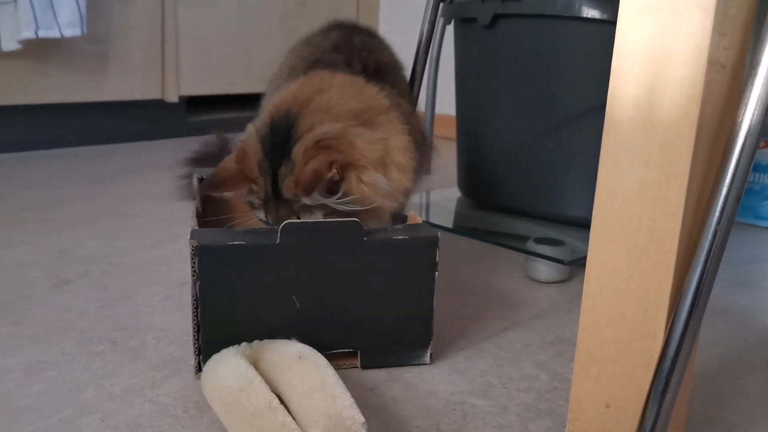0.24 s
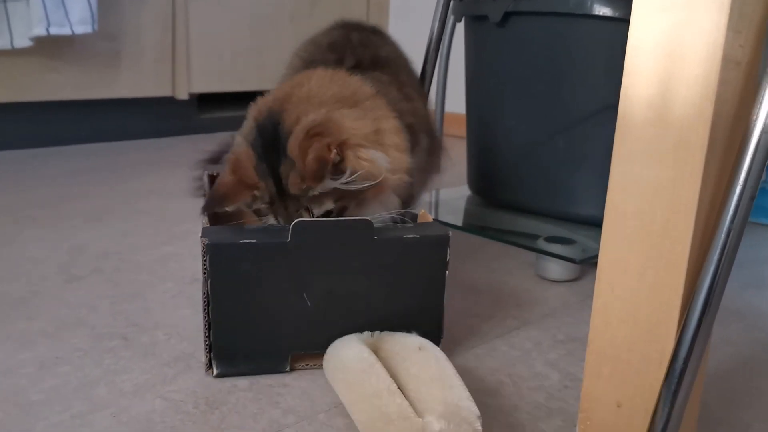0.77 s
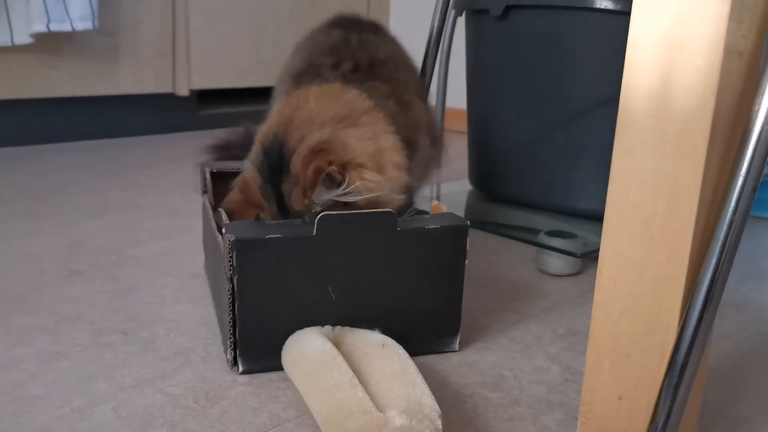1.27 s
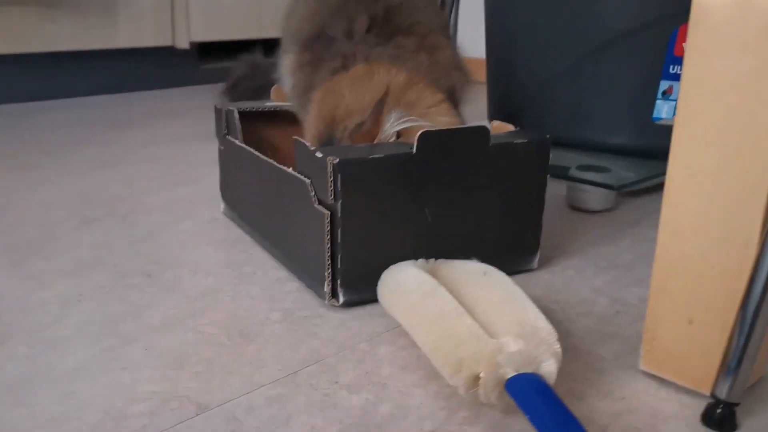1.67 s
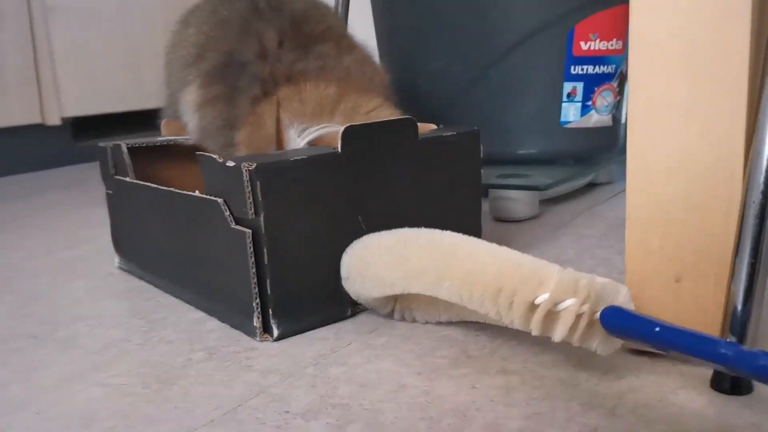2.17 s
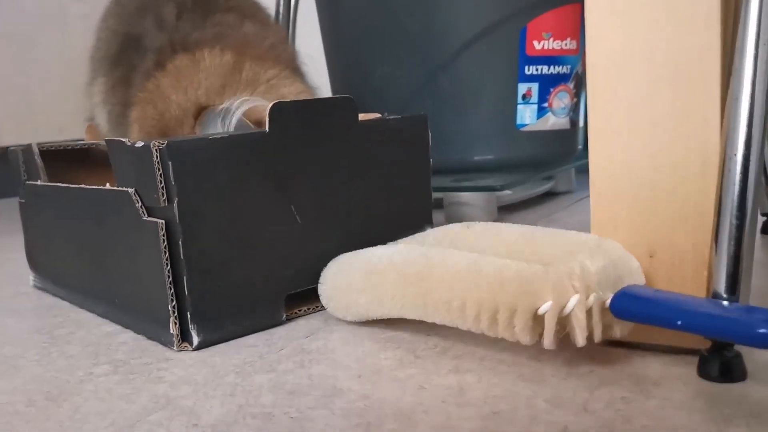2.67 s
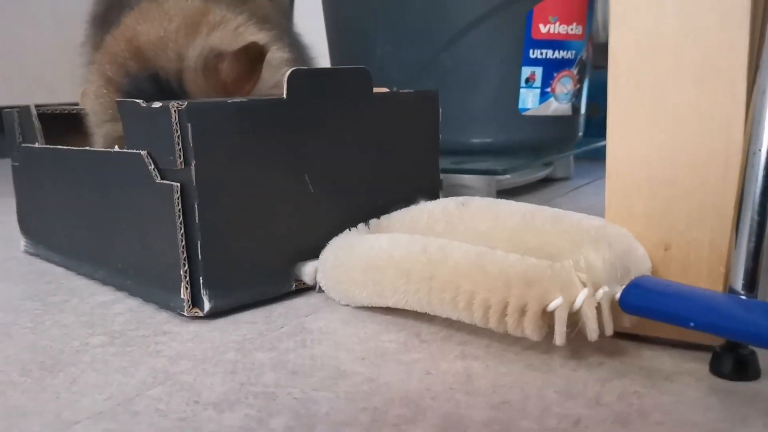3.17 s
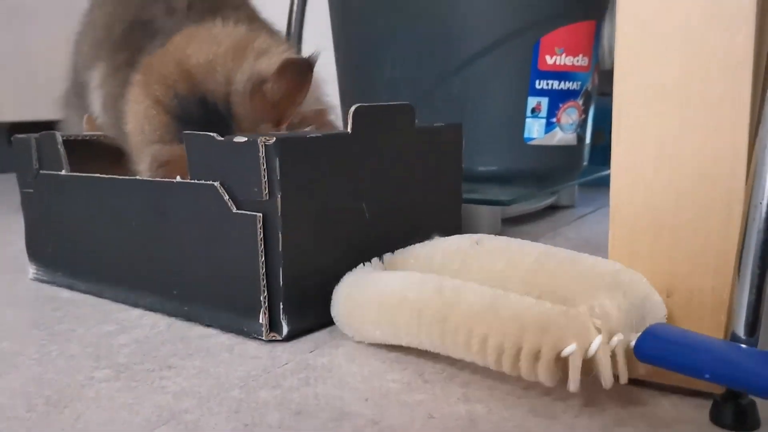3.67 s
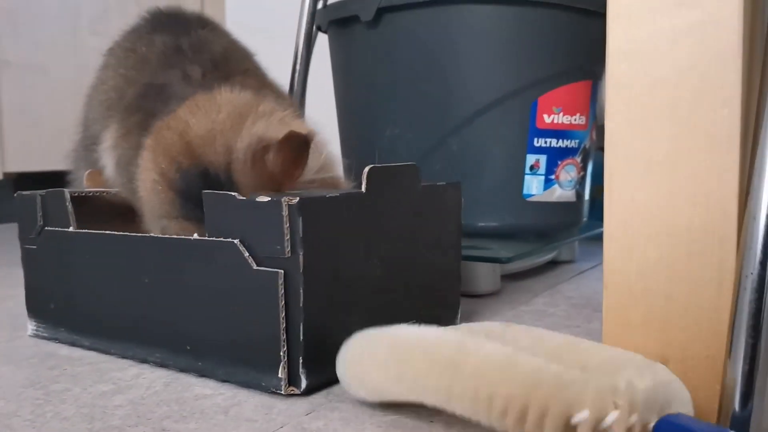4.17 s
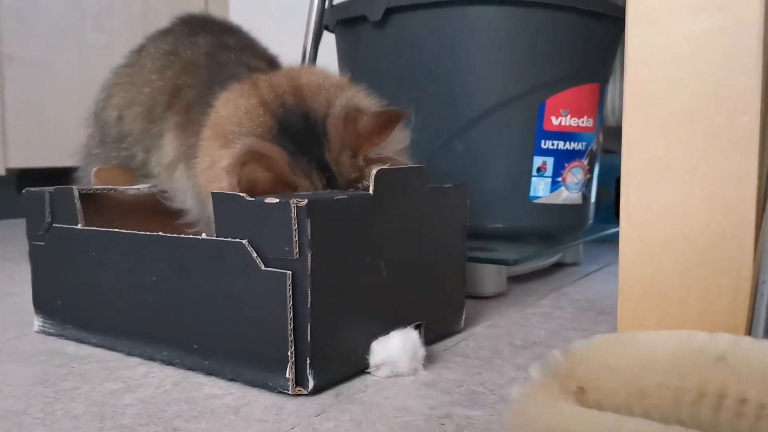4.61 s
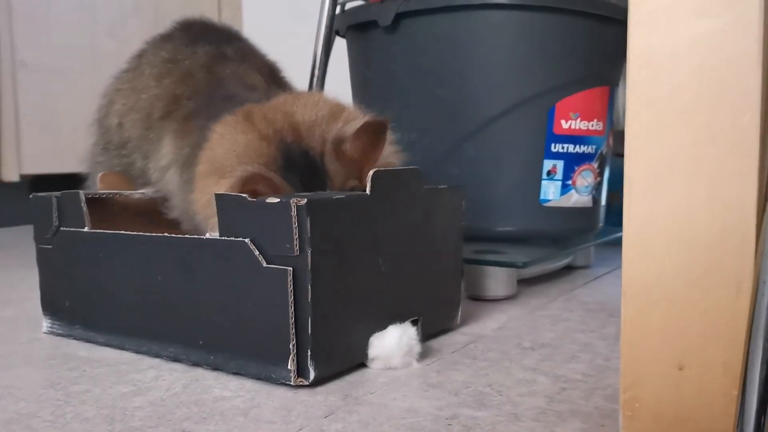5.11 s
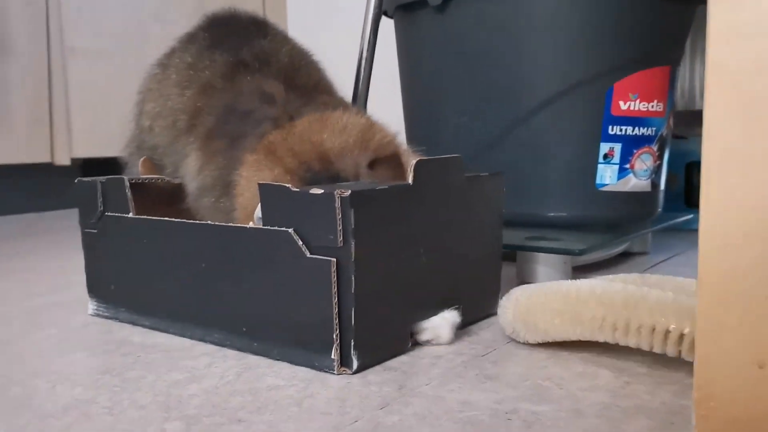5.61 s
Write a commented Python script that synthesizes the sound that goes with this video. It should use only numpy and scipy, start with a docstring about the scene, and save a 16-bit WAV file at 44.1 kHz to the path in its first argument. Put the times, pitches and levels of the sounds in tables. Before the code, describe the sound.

A cat paws and scratches inside a cardboard box, with hollow knocks, dry claw scrapes and soft pad swishes in a quiet kitchen.

```python
"""Kitchen floor, bare room: a cat digs about in a cardboard box, teased with a soft mop pad.
Paws knock on the walls and claws scrape the card: jerky stick-slip noise and impulses drive damped modes.
The pad swishes as smooth coloured noise; echoes of box and room are shaped noise.
Damped sines make low bumps of the handled microphone and one soft thud of the pad.
Low noise makes the rumble of microphone and rocking box, over a faint hush."""
import sys
import numpy as np
from scipy import signal
from scipy.fft import rfft, irfft
from scipy.io import wavfile

SR = 44100
rng = np.random.default_rng(int(sys.argv[2]) if len(sys.argv) > 2 else 0)


def int16_out(signal):
    """Quantize to a 16-bit WAV file."""
    q = np.round(np.clip(np.atleast_2d(signal).T, -1, 1) * 32767)
    wavfile.write(sys.argv[1], SR, q.astype(np.int16))


N = 257984
PORT_LEAD_S = 0.00015  # left port leads


def from_db(db):
    """Amplitude gain of a level in dB."""
    return 10 ** (np.asarray(db) / 20)


def rms_one(x):
    """Scales to rms 1 over all channels."""
    return x / np.sqrt(np.mean(x ** 2) + 1e-20)


def unit_energy(x):
    """Scales an impulse response to energy 1, averaged over channels."""
    return x / np.sqrt(np.mean(np.sum(x ** 2, axis=-1)) + 1e-20)


def in_time(rows):
    """Straight-line curve through (time [s], value) rows."""
    return np.interp(np.arange(N) / SR, *np.transpose(rows))


def at_hz(points, hz):
    """Curve through (frequency [Hz], value) rows, straight over log frequency."""
    known_hz, values = np.transpose(points)
    return np.interp(np.log(np.maximum(hz, 1)), np.log(known_hz), values)


def colour(x, spectrum, share=1):
    """Applies a smooth dB spectrum, or a share of it."""
    size = x.shape[-1]
    gain = from_db(share * at_hz(spectrum, np.fft.rfftfreq(size, 1 / SR)))
    return irfft(rfft(x) * gain, size)


def drift(knots_per_s):
    """Straight lines between random knots of spread 1."""
    knots = rng.standard_normal(int(N / SR * knots_per_s) + 2)
    return np.interp(np.arange(N) / SR * knots_per_s, np.arange(len(knots)), knots)


def swell(t, start, hold, rise, fall):
    """Grows exponentially towards its start, holds, and dies away; all in s."""
    before = (start - t) / rise
    after = (t - start - hold) / fall
    return np.exp(-np.maximum(np.maximum(before, after), 0))


def through(x, response):
    """Convolves each channel with an impulse response."""
    return signal.fftconvolve(np.atleast_2d(x), np.atleast_2d(response), axes=1)[:, :N]


# likeness of the ports for scattered sound: (frequency [Hz], correlation [-1..1])
LIKENESS = [(60, 1), (300, 0.93), (650, 0.83), (1400, 0.3), (2300, 0.43), (3100, -0.9), (6500, 0.59),
            (15000, 0.57)]


def diffuse(size):
    """Stereo white noise whose left-right correlation depends on frequency."""
    mid, side = rfft(rng.standard_normal((2, size)))
    alike = np.clip(at_hz(LIKENESS, np.fft.rfftfreq(size, 1 / SR)), -1, 1)
    spectra = np.sqrt(1 + alike) * mid + np.sqrt(1 - alike) * side * [[1], [-1]]
    return rms_one(irfft(spectra, size))


# room decay: (frequency [Hz], t60 [s])
ROOM_T60_S = [(200, 0.37), (500, 0.19), (1000, 0.4), (2300, 0.4), (6500, 0.39), (12000, 0.38)]


def room_tail(size=32768):
    """Scattered room sound: noise that builds up over some 14 ms and dies band by band."""
    t, hz = np.arange(size) / SR, np.fft.rfftfreq(size, 1 / SR)
    noise = rfft(diffuse(size))
    centres_hz = [row[0] for row in ROOM_T60_S]
    tail = 0
    # each band is a triangle over log frequency that peaks at its centre
    for weights, (_, t60_s) in zip(np.eye(len(centres_hz)), ROOM_T60_S):
        band = irfft(noise * at_hz(list(zip(centres_hz, weights)), hz))
        tail = tail + band * from_db(-60 * t / t60_s)
    return unit_energy(tail * (1 - np.exp(-(t / 0.014) ** 2)))


def path(tail, direct_db, box_db, room_db, box_decay_s, left_lead_s):
    """Way to the ports: straight, rattling round the box, and by the room."""
    t = np.arange(tail.shape[-1]) / SR
    arrival_s = left_lead_s * np.array([[-.5], [.5]]) + 8 / SR
    direct = np.sinc((t - arrival_s) * SR) * (t < .001)
    dying = from_db(-60 * t / box_decay_s) * (1 - np.exp(-(t / 0.0011) ** 2))
    echoes = rfft(diffuse(len(t)) * dying)
    # walls scatter all pitches about equally: flatten, then damp again
    flat = irfft(echoes / (np.abs(echoes) + 1e-12))
    echoes = unit_energy(flat * np.sqrt(dying))
    return from_db(direct_db) * direct + from_db(box_db) * echoes + from_db(room_db) * tail


def ringing(modes, low_hz, high_hz, order=2, size=8192):
    """Impulse response of damped modes inside a band, with unit energy."""
    t = np.arange(size) / SR
    rings = 0
    for k, (hz, width_hz, db) in enumerate(modes):
        decay = width_hz * np.exp(-np.pi * width_hz * t)
        rings = rings + (-1) ** k * from_db(db) * decay * np.cos(2 * np.pi * hz * t)
    band = signal.butter(order, [low_hz, min(high_hz, .45 * SR)], "band", fs=SR, output="sos")
    return unit_energy(signal.sosfilt(band, rings))


def slips(per_s, spread_db, clump_db, rub):
    """Tiny stick-slip snaps of uneven size, in clumps, over smooth rubbing; rms 1."""
    sizes = from_db(spread_db * np.minimum(rng.exponential(1, N), 3)) * rng.choice([-1, 1], N)
    snaps = rms_one(sizes * (rng.random(N) < per_s / SR))
    rubbing = rub * rng.standard_normal(N)
    return rms_one((snaps + rubbing) * from_db(clump_db * drift(170)))


# hush spectrum: (frequency [Hz], level [dB])
HUSH_SPECTRUM = [(20, 0.5), (100, -1.5), (300, 0), (700, -11.5), (1500, -4.5), (2400, -13.5), (3100, -10),
                 (5000, -12), (7000, -10), (8500, -36), (10500, -35.5), (15000, -32)]


def hush():
    """Faint steady background: coloured stereo noise."""
    return from_db(-58.5) * rms_one(colour(diffuse(N), HUSH_SPECTRUM))


# low bumps, microphone handling and one soft thud of the mop pad:
# (time [s], level [dB], pitch [Hz], contact click re bump [dB])
LOW_BUMPS = [(1.235, -36, 83, -4), (1.746, -34.5, 145, -21), (1.924, -41.5, 172, -19),
             (2.452, -42.5, 123, -10), (2.772, -29.5, 56, -51), (3.703, -37, 119, 9.5),
             (3.779, -40.5, 159, -14), (3.893, -30.5, 161, -6), (3.919, -37, 111, -10),
             (3.966, -36.5, 76.5, 7), (5.087, -40.5, 86, -4), (5.315, -39, 58, 4.5),
             (5.541, -32.5, 102, -8), (5.597, -45, 100, -8), (5.719, -39.5, 152, 0.5)]
# low rumble from the handled microphone and the box rocking on the floor: (time [s], relative level [dB])
LOW_RUMBLE = [(0.0, -72.5), (1.12, -71), (1.32, -53.5), (1.43, -61), (1.6, -56.5), (1.83, -52), (2.0, -66),
              (2.27, -57.5), (2.65, -70), (3.07, -55), (3.3, -60), (3.75, -62), (3.94, -46), (4.06, -68),
              (4.38, -63.5), (4.8, -65.5), (5.45, -61.5), (5.57, -53), (5.85, -73)]
# rumble spectrum: (frequency [Hz], level [dB])
RUMBLE_SPECTRUM = [(20, 2), (50, 7), (100, -0.5), (180, -6), (300, -15.5), (600, -13), (2000, -66)]
BUMP_CYCLES, LINGER_DB_PER_DB = 2.36, 0.13  # cycles per 60 dB of decay; softer contact rings longer
SHAKE_DB, SHAKE_RISE_S, SHAKE_FALL_S = -22, 0.0044, 0.03  # level re bump


def bumps_and_rumble(left_db, right_db):
    """Damped sine bumps with soft contact clicks, and a lumpy noise rumble that swells at each bump."""
    t, bumps, shake = np.arange(SR // 4) / SR, np.zeros(N + SR), 0
    click = np.sin(2 * np.pi * 420 * t) * np.exp(-t / 0.002)
    for s, db, hz, click_db in LOW_BUMPS:
        cycles = BUMP_CYCLES * from_db(-LINGER_DB_PER_DB * click_db)
        at, age = round(s * SR), hz * t / cycles
        bump = np.sin(2 * np.pi * hz * t) * (1 - np.exp(-(age / 0.13) ** 2)) * from_db(-60 * age)
        bumps[at:at + len(t)] += from_db(db) * (bump / np.abs(bump).max() + from_db(click_db) * click)
        shake = shake + from_db(db + SHAKE_DB) * swell(np.arange(N) / SR, s, 0, SHAKE_RISE_S, SHAKE_FALL_S)
    level = from_db(0.5 + in_time(LOW_RUMBLE) + 2.2 * drift(23))
    rumble = rms_one(colour(rng.standard_normal((2, N)), RUMBLE_SPECTRUM)) * np.hypot(level, shake)
    shared = (bumps[:N] + rumble[0]) * from_db([[left_db], [right_db]])
    return shared + rumble[1] * from_db([[-6.5], [-12]])


# sliding pad and fur, and one brief hissing claw catch: (start [s], length [s], level [dB])
SWISHES = [(0.176, 0.17, -46), (0.57, 0.085, -58), (1.174, 0.064, -61), (1.285, 0.011, -32.5),
           (1.512, 0.11, -51), (2.234, 0.055, -41), (3.484, 0.041, -48), (3.875, 0.084, -58.5),
           (4.526, 0.23, -47.5), (4.8, 0.24, -55), (5.522, 0.054, -51.5)]
# swish spectrum: (frequency [Hz], level [dB])
SWISH_SPECTRUM = [(300, -25), (1200, -29), (2300, -40), (3000, -4.5), (4500, -7.5), (6000, 0.5),
                  (7300, 2.5), (8300, -10.5), (10000, -24), (15000, -30)]
SWISH_ATTACK_S, SWISH_RELEASE_S, FUR_DB = 0.02, 0.043, -64  # the fur never quite stops rubbing


def swish(tail):
    """Fine, even hiss of sliding fibres and one claw catch: dense slips and rubbing, coloured."""
    t = np.arange(N) / SR
    power = from_db(FUR_DB) ** 2
    for s, length_s, db in SWISHES:
        power = power + (from_db(db) * swell(t, s, length_s, SWISH_ATTACK_S, SWISH_RELEASE_S)) ** 2
    grain = slips(per_s=5000, spread_db=-0.5, clump_db=-1.5, rub=0.84)
    hiss = rms_one(colour(grain, SWISH_SPECTRUM)) * np.sqrt(power)
    way = path(tail, direct_db=-1.0, box_db=-0.5, room_db=-7, box_decay_s=0.066, left_lead_s=PORT_LEAD_S)
    return through(hiss, way)


# readiness to answer a paw: panel, corrugation, claw [dB]
RESPONSE_DB = [-1, -0.63, -0.5]


def shares(bite_db, rasp_db):
    """Gains of panel, corrugation, claw: bite moves force from wall to claws, rasp digs into the card."""
    return from_db(np.array(RESPONSE_DB) + [-bite_db, rasp_db, bite_db])


# bite: below 0 the soft pad drums on the wall, above 0 the claws hiss; rasp: digging into the corrugation
# paw strokes: (peak time [s], rise [s], release [s], level [dB], bite [dB], rasp [dB])
STROKES = [(.24, 0.039, 0.067, -42.5, -0.5, 4.5), (0.35, 0.083, 0.025, -41, 0, 0),
           (.654, 0.0084, 0.021, -37.5, -4, -3), (.775, 0.0022, .02, -41, -10, -11),
           (0.798, 0.0084, 0.055, -28, 0.5, -3), (1.149, 0.037, 0.057, -47.5, -5, -2),
           (1.285, 0.031, 0.047, -29, 1, 1), (1.562, 0.074, .032, -44, 1.5, -1.5),
           (1.758, 0.035, 0.03, -39, 1, -2), (1.845, 0.0072, 0.036, -33, 6.5, 0.5),
           (2.064, .004, 0.078, -48.5, -0.5, -8), (2.243, 0.057, .032, -36, -0.5, -2),
           (2.532, 0.012, 0.018, -41.5, -5.5, -4), (2.55, 0.0022, 0.03, -38, -5, 3),
           (2.591, 0.02, 0.025, -32.5, -3, 1.5), (2.824, 0.011, 0.014, -49.5, -5.5, -3),
           (2.895, 0.014, .045, -42, -4, -1), (2.974, 0.022, 0.076, -33.5, -3, -2.5),
           (3.055, .014, 0.042, -34.5, -3.5, 0.5), (3.21, 0.0094, 0.016, -47, -13.5, -1),
           (3.354, 0.026, 0.021, -40.5, -3.5, -3), (3.415, .012, .03, -52, -12, -16),
           (3.505, 0.05, 0.024, -37, -2, -0.5), (3.628, 0.005, 0.029, -25.5, 1, 1.5),
           (3.708, .012, 0.032, -43.5, 5, 7.5), (3.795, 0.027, 0.02, -47.5, 5, 2.5),
           (4.208, 0.0046, 0.065, -47, 1, -3.5), (4.358, 0.0073, 0.032, -47, -1, -3.5),
           (4.497, 0.0045, 0.027, -44, 2, 1), (4.597, .004, 0.026, -44, 6.5, 3),
           (5.145, 0.043, 0.048, -37.5, 2, -0.5), (5.4, 0.021, 0.015, -46, -1, 1),
           (5.63, 0.016, 0.032, -46.5, 1.5, -4)]
# cat shifting its weight between strokes: (time [s], relative level [dB])
SHUFFLE = [(0, -54), (.5, -51), (1.05, -67), (1.5, -55), (2.15, -55), (2.45, -58), (2.8, -70),
           (3.15, -48.5), (3.5, -48.5), (4.25, -52), (4.7, -64), (5.05, -69), (5.25, -45), (5.85, -57.5)]
SHUFFLE_DB, SHUFFLE_BITE_DB, SHUFFLE_RASP_DB = -5.5, 0, -2
SHUFFLE_UNEVEN_DB, SHUFFLE_KNOTS_PER_S = 2.5, 16
JERK_DB, JERK_KNOTS_PER_S = 2.5, 64


def stroke_force():
    """Jerky strokes over uneven shuffling of the feet: pressure on panel, corrugation and claw."""
    t_full = np.arange(N) / SR
    t = np.arange(0, N, 16) / SR  # coarse grid for the slow envelopes
    uneven_db = SHUFFLE_UNEVEN_DB * drift(SHUFFLE_KNOTS_PER_S)
    shuffle = from_db(SHUFFLE_DB + in_time(SHUFFLE) + uneven_db)
    power = np.outer(shares(SHUFFLE_BITE_DB, SHUFFLE_RASP_DB), np.interp(t, t_full, shuffle)) ** 2
    for s, rise, release, db, bite_db, rasp_db in STROKES:
        power = power + np.outer(from_db(db) * shares(bite_db, rasp_db), swell(t, s, 0, rise, release)) ** 2
    jerks = from_db(JERK_DB * drift(JERK_KNOTS_PER_S))
    return [jerks * np.interp(t_full, t, np.sqrt(p)) for p in power]


# paw knocks and claw catches: (time [s], relative level [dB], bite [dB], rasp [dB])
KNOCKS = [(.1554, 3.5, -8, -0.5), (.619, -6.5, -11, 0), (.654, -10, -2, 2), (.775, -23, -11, -6),
          (.8, 3, 6.5, -1), (.821, -4, -4.5, -1), (1.246, -12, 0.5, 4), (1.271, -4, 7, 2),
          (1.279, 3.5, 6.5, -6), (1.295, -16, 6, 5), (1.749, -6, 10, 0), (1.816, 0.5, 2, -6),
          (1.831, -6, 8, -5), (1.838, 2.5, 4, 4.5), (2.55, -15, -4.5, 1), (2.570, -8, -3.5, 0),
          (2.579, -4.5, 0, 2), (2.595, -9, -5.5, -9), (2.804, -16.5, -0.5, -3), (2.962, -4.5, 1.5, -2),
          (3.03, -2, -3.5, 1), (3.087, -9, -0.5, -15), (3.293, -18, -3, 2), (3.3, -8, 3.5, -2),
          (3.445, -14.5, 2, -1), (3.618, -4, 1, -1), (3.63, -1.5, 5, -4), (3.702, -15.5, -1.5, -5),
          (3.842, -24, 5.5, -7), (3.966, -22, -9.5, -2), (4.593, -17.5, 2.5, 6), (5.612, -11.5, 5, -0.5)]


def knock_force():
    """One-sample push for each knock, shared among panel, corrugation and claw."""
    force = np.zeros((3, N))
    for s, db, bite_db, rasp_db in KNOCKS:
        force[:, round(s * SR)] += from_db(db) * shares(bite_db, rasp_db)
    return force


def wander(pressure, grain, knocks, modes, band_hz, way, count=3):
    """The paw moves between places on the card, each with its own slips, echoes and retuned modes."""
    nearness = np.exp(np.array([drift(7) for _ in range(count)]))
    out = 0
    for share in nearness / nearness.sum(axis=0):
        force = np.sqrt(share) * pressure * grain() + share * knocks
        own_modes = [(hz * (1 + rng.normal(0, 0.016)), width_hz, db + rng.normal(0, 3.3))
                     for hz, width_hz, db in modes]
        out = out + through(through(force, ringing(own_modes, *band_hz, order=3)), way())
    return out


def pad_grain():
    """Grain of the soft paw pad on the wall."""
    return from_db(-2.5) * slips(per_s=1500, spread_db=3.0, clump_db=6.0, rub=0.46)


def ridge_grain():
    """Coarse snaps over the ridges of the corrugation."""
    return from_db(-4.0) * slips(per_s=1000, spread_db=6.0, clump_db=4.0, rub=0.27)


def claw_grain():
    """Dense snaps of claw on paper."""
    return from_db(-1.5) * slips(per_s=2200, spread_db=3, clump_db=7, rub=0.42)


def card_way(tail):
    """From the card to the ports: short box echoes."""
    return path(tail, direct_db=-5.0, box_db=-2.0, room_db=-5.0, box_decay_s=0.041, left_lead_s=.0001)


def claw_way(tail):
    """The claws work out of sight: mostly scattered sound."""
    return path(tail, direct_db=-13.5, box_db=-2.5, room_db=-6.0, box_decay_s=0.12, left_lead_s=PORT_LEAD_S)


# box rocking on the floor: (frequency [Hz], width [Hz], level [dB])
ROCKING = [(108, 53, -2.5), (179, 42, 0.5)]


def rocking(push):
    """The whole box rocks: low damped modes."""
    return through(from_db(-21) * push * pad_grain(), ringing(ROCKING, 65, 290))


# ring of the hollow box: (frequency [Hz], width [Hz], level [dB])
HOLLOW = [(238.6, 13.4, -2.5), (285, 16, -3.5), (422, 19, -13), (466, 7.2, -1.5), (610, 38, -7.5),
          (759, 65, -5.5), (874, 13, 1.5)]


def hollow(push, jolt):
    """The hollow hums on after every push: mostly narrower, longer modes."""
    return through(from_db(-12.0) * (jolt + push * pad_grain()), ringing(HOLLOW, 230, 1300))


# leaned-on wall: (time [s], pitch [Hz])
LOADED_WALL = [(0, 431), (1.9, 404), (2.2, 468), (3.56, 474), (3.615, 610), (3.68, 560), (3.72, 460),
               (4.0, 413), (4.2, 586), (4.4, 573), (5.15, 480), (5.85, 449)]
LOADED_WIDTH_HZ = 29  # at mean pitch


def loaded_wall(push, thump, tail):
    """One resonance follows the cat's weight: it rings on a clock that runs faster as the wall is tensed."""
    force = from_db(-5) * push * pad_grain() + from_db(-7) * thump
    pitch_hz = in_time(LOADED_WALL)
    mean_hz = pitch_hz.mean()
    clock = np.cumsum(pitch_hz / mean_hz)
    warped = np.interp(np.arange(N), clock, force)
    mode = ringing([(mean_hz, LOADED_WIDTH_HZ, 0)], mean_hz / 2, 2 * mean_hz)
    rings = signal.fftconvolve(warped, mode)
    wall = np.interp(clock, np.arange(len(rings)), rings)
    way = path(tail, direct_db=-2.5, box_db=-4.5, room_db=-4, box_decay_s=.1, left_lead_s=.00003)
    return through(wall, way)


# first flex of a struck wall: (frequency [Hz], width [Hz], level [dB])
FLEX = [(730, 270, 0)]


def flex(thump, tail):
    """A struck wall first flexes, straight towards the microphone: one broad mode."""
    bend = through(from_db(1) * thump, ringing(FLEX, 340, 1770))
    way = path(tail, direct_db=-3.5, box_db=-5.0, room_db=-7, box_decay_s=0.064, left_lead_s=-0.0002)
    return through(bend, way)


# wall modes: (frequency [Hz], width [Hz], level [dB])
PANEL = [(227, 34, -12.5), (288.6, 12.4, -1), (424, 57, -5), (594, 67, -3.5), (763, 72, -4),
         (874, 50, -5.5), (1089, 122, -6.5)]


def panel(push, jolt, tail):
    """Pad friction and jolts ring the wall modes."""
    def way():
        return path(tail, direct_db=-4, box_db=-4.0, room_db=-4, box_decay_s=0.099, left_lead_s=.00003)
    return wander(from_db(-1.5) * push, pad_grain, from_db(-11) * jolt, PANEL, (205, 1550), way)


# corrugated card modes: (frequency [Hz], width [Hz], level [dB])
CORRUGATION = [(1270, 194, 7), (1766, 92, 12.5), (1900, 79, 12.5), (2380, 390, 10.5), (2610, 200, 1),
               (2960, 870, -2.5)]


def corrugation(rasp, crack, tail):
    """Snaps over the ridges ring the corrugated card."""
    return wander(rasp, ridge_grain, crack, CORRUGATION, (1100, 3300), lambda: card_way(tail))


# claw-on-paper modes: (frequency [Hz], width [Hz], level [dB])
CLAW = [(3305, 740, -7), (3806, 590, 1.5), (5100, 1640, -9.5), (5773, 290, 2.5), (6370, 495, -1),
        (6590, 480, 3), (7370, 1010, -3)]


def claw(hiss, tick, tail):
    """Fine snaps of claw on paper ring broad treble modes."""
    return wander(hiss, claw_grain, tick, CLAW, (2800, 7900), lambda: claw_way(tail))


# paper fibre spectrum: (frequency [Hz], level [dB])
FIBRE_SPECTRUM = [(800, 4), (1300, -20), (3000, 5), (5000, 16.5), (8500, 6.5), (9800, 0), (11000, -10),
                  (15000, -16)]


def fibre_crackle(hiss, tick, tail):
    """Dry crackle of paper fibres: claw snaps coloured without ringing modes."""
    crackle = colour(hiss * claw_grain() + tick, FIBRE_SPECTRUM)
    return through(from_db(-19.0) * crackle, claw_way(tail))


# brief pitched chatter, snagged card edges and a juddering wall:
# (time [s], ring [Hz], level [dB], rise [s], fall [s])
CHATTERS = [(0.803, 2640, -27, 0.0051, 0.035), (1.821, 766, -24, 0.0034, 0.0065),
            (1.84, 2290, -16, 0.0014, 0.003), (2.595, 2400, -40, 0.016, 0.01),
            (3.302, 3560, -33, 0.0018, 0.0074), (4.357, 3700, -42.5, 0.0099, 0.037),
            (4.595, 2190, -30.5, 0.0047, 0.017), (5.125, 3600, -38, 0.019, 0.024),
            (5.14, 2190, -36, 0.027, 0.036)]


def pitched_chatter(tail):
    """Snagged edges and a juddering wall chatter briefly, each at one pitch: slips through a single mode."""
    t, out = np.arange(N) / SR, 0
    for s, hz, db, rise, fall in CHATTERS:
        mode = ringing([(hz, 0.11 * hz, 0)], hz / 2, 2 * hz)
        chatter = rms_one(through(slips(per_s=2000, spread_db=3, clump_db=2, rub=.4), mode))
        out = out + from_db(db) * chatter * swell(t, s, 0, rise, fall)
    return through(out, card_way(tail))


# left-right balance of the box sounds, swayed by handling at the right port: (time [s], left-right [dB])
BOX_BALANCE = [(0.0, -0.5), (3.84, -2), (5.03, 1.5), (5.12, -7), (5.26, 1.5), (5.59, -4), (5.85, 1)]


def box(tail):
    """Strokes, knocks and claw catches drive every resonance of the box."""
    push, rasp, hiss = stroke_force()
    thump, crack, tick = knock_force()
    # a catching claw jolts panel, corrugation and paper at once
    catches = slips(per_s=130, spread_db=5.5, clump_db=0, rub=0)
    jolt = from_db(-3) * thump + from_db(-5.0) * push * catches
    crack = crack + from_db(-2) * rasp * catches
    tick = tick + from_db(-6) * hiss * catches
    walls = panel(push, jolt, tail) + loaded_wall(push, thump, tail) + flex(thump, tail)
    body = rocking(push) + hollow(push, jolt)
    card = corrugation(rasp, crack, tail) + pitched_chatter(tail)
    paper = claw(hiss, tick, tail) + fibre_crackle(hiss, tick, tail)
    return (walls + body + card + paper) * from_db(in_time(BOX_BALANCE) * [[.5], [-.5]])


def scene():
    """Box and swishes share one room, over a faint hush, low bumps and rumble."""
    tail = room_tail()
    return hush() + bumps_and_rumble(left_db=-15, right_db=8.5) + swish(tail) + box(tail)


# treble difference of the ports, scaled per port: (frequency [Hz], relative left-right [dB])
PORTS = [(300, 0.5), (1000, 1.2), (2300, -0.14), (4300, .5), (5700, 1), (7000, 6), (8200, 10), (10500, 3),
         (15000, 0)]
CUTOFF_HZ = 15300


def record(dry):
    """The left port is the brighter one; a steep low-pass cuts the top."""
    ports = np.array([colour(dry[0], PORTS, share=0.38), colour(dry[1], PORTS, share=-1.55)])
    low_pass = signal.ellip(10, .1, 80, CUTOFF_HZ, fs=SR, output="sos")
    return signal.sosfilt(low_pass, ports)


dry = scene()
out = record(dry)
int16_out(out)
```